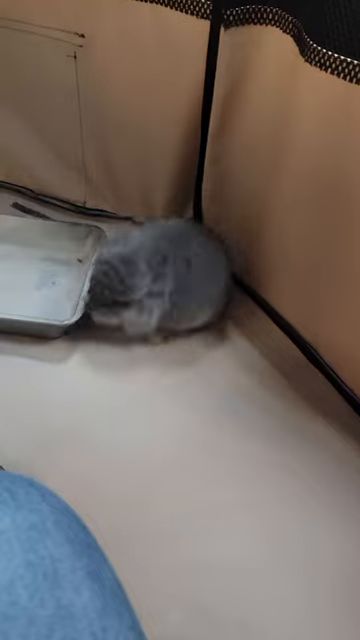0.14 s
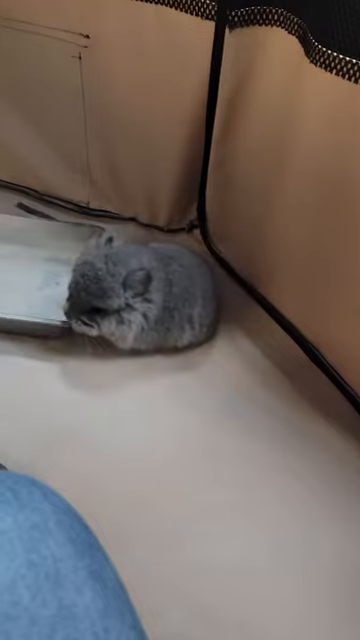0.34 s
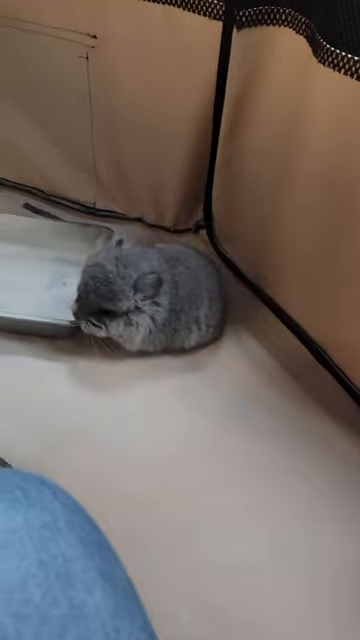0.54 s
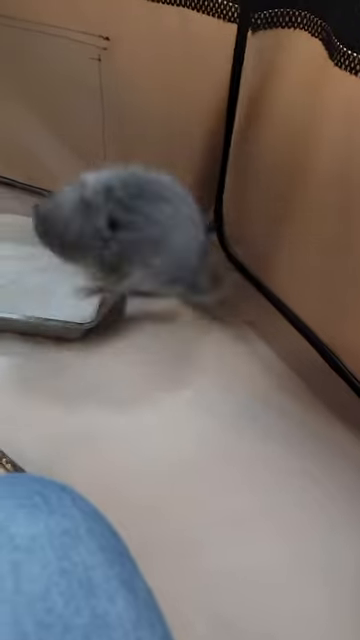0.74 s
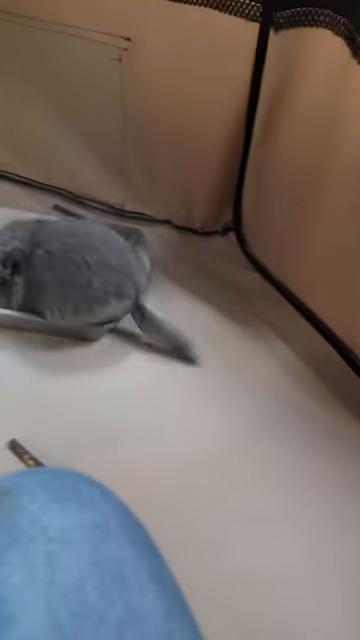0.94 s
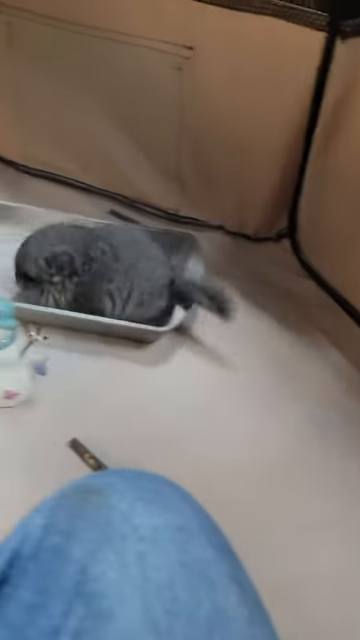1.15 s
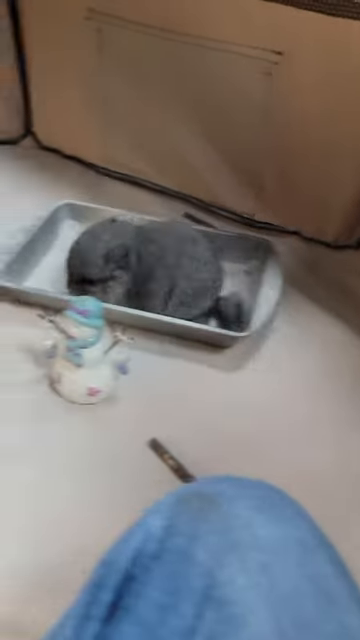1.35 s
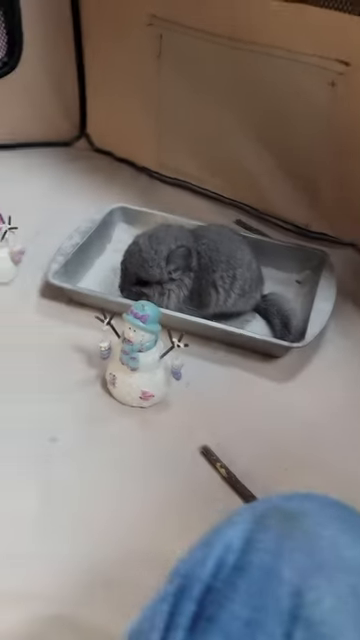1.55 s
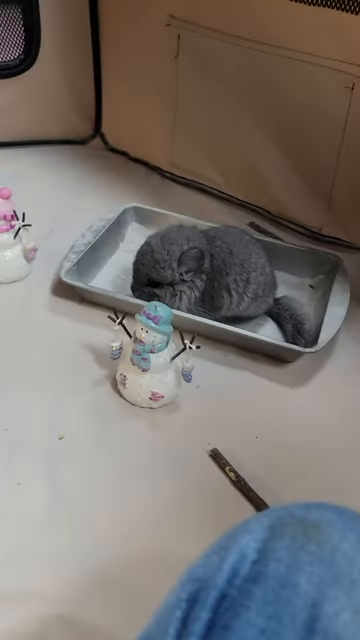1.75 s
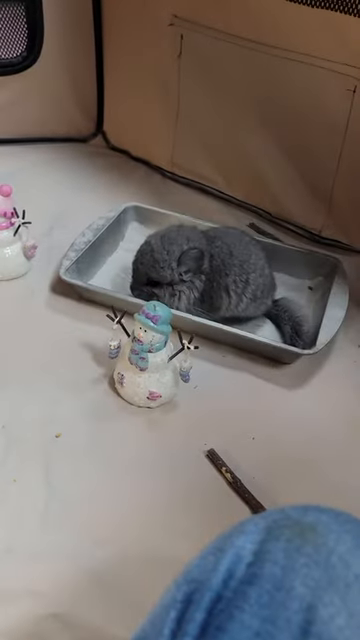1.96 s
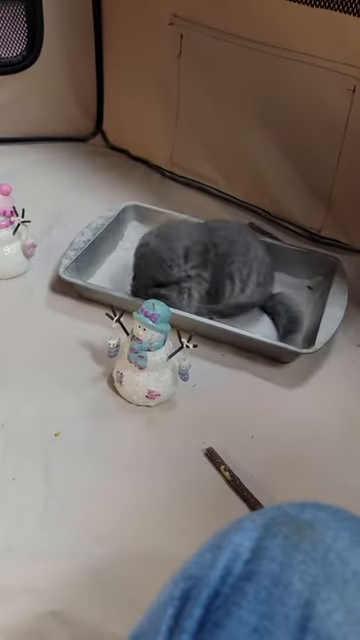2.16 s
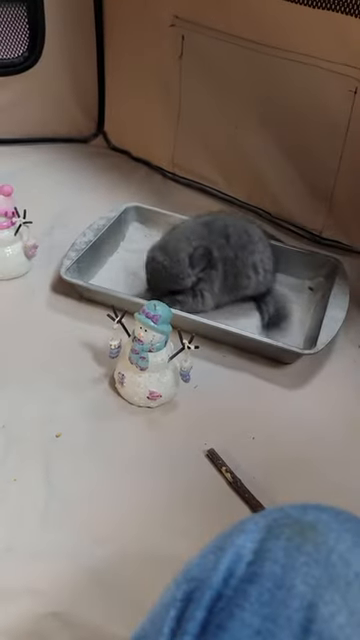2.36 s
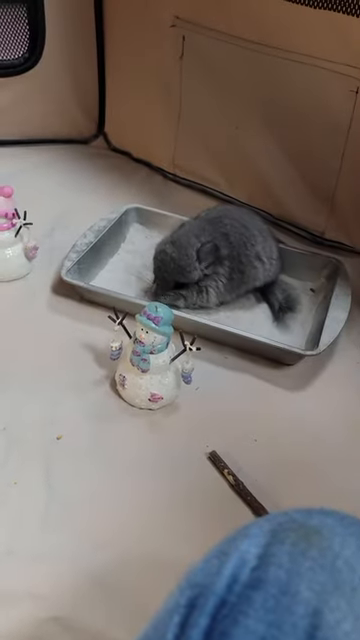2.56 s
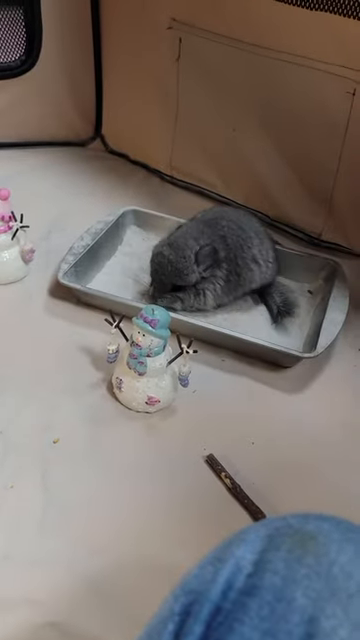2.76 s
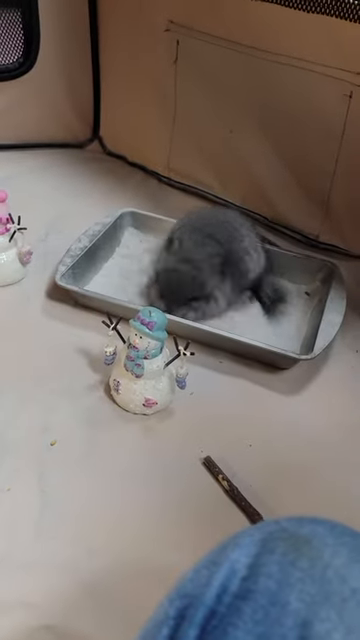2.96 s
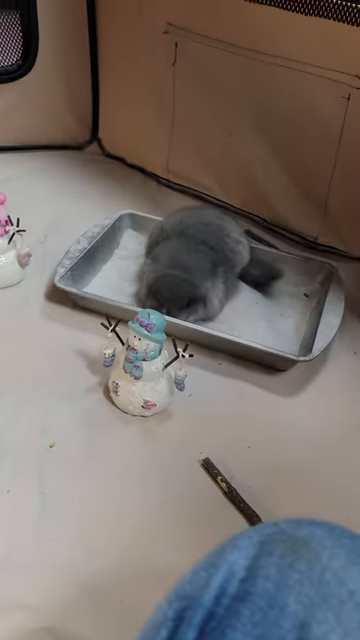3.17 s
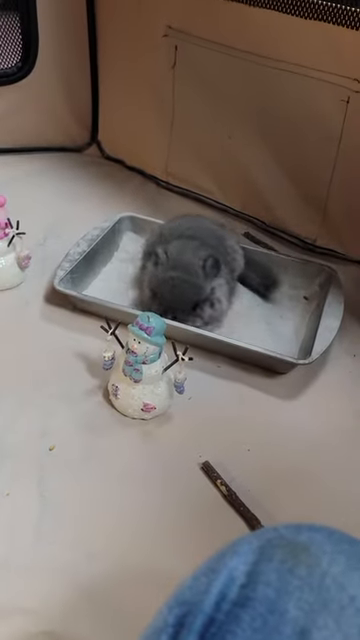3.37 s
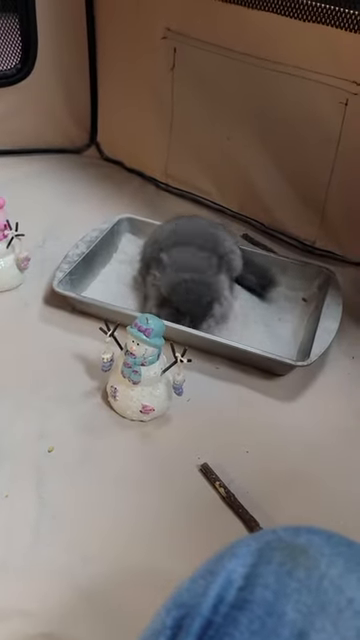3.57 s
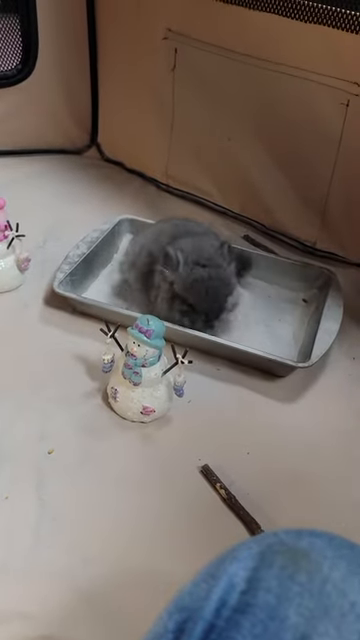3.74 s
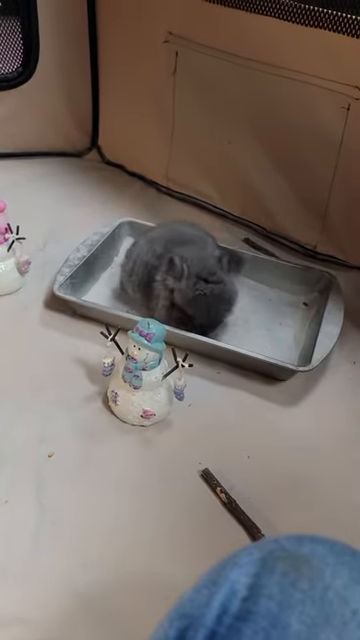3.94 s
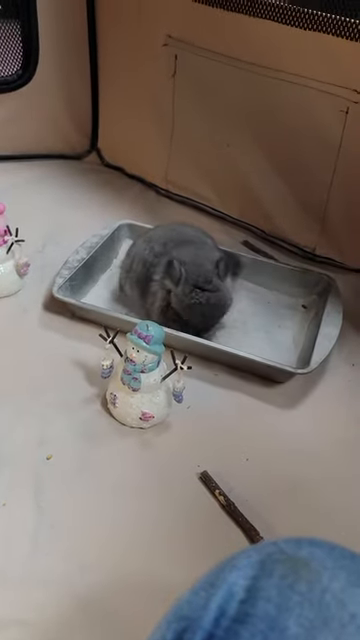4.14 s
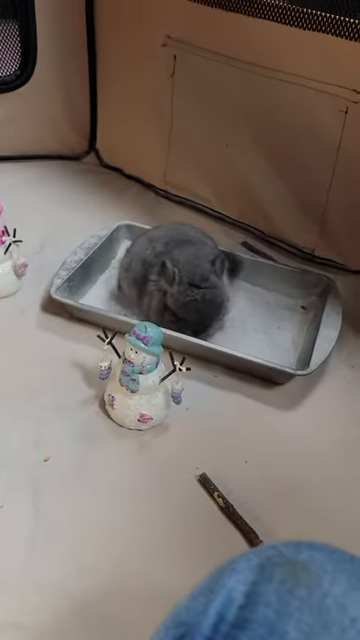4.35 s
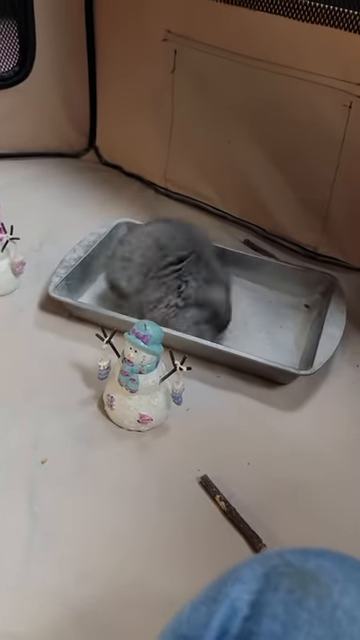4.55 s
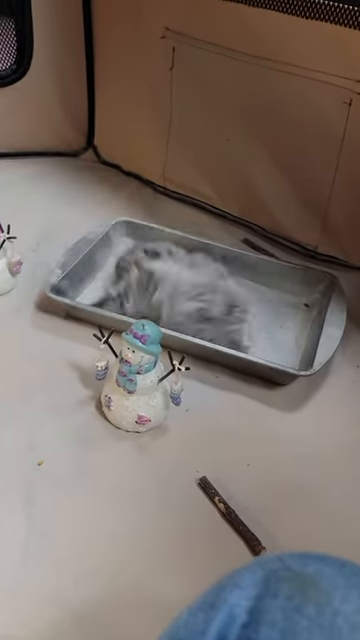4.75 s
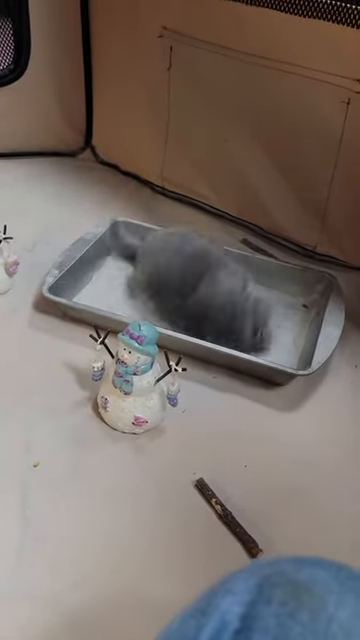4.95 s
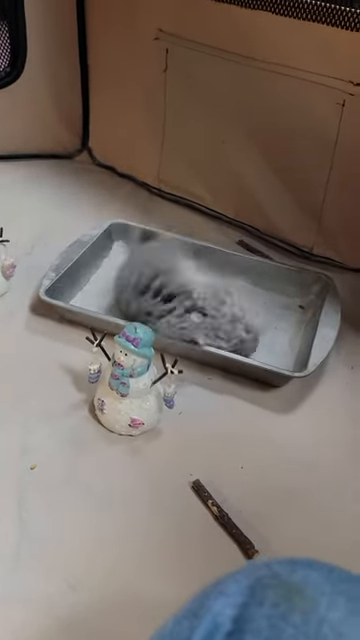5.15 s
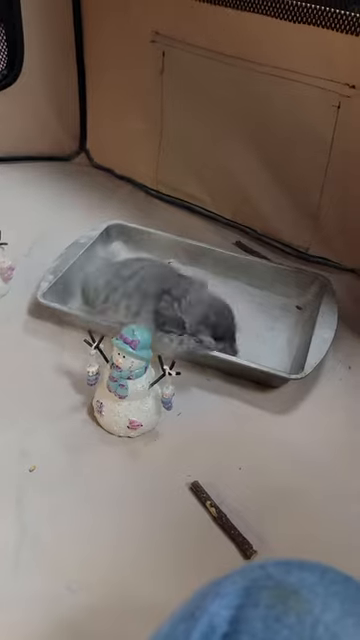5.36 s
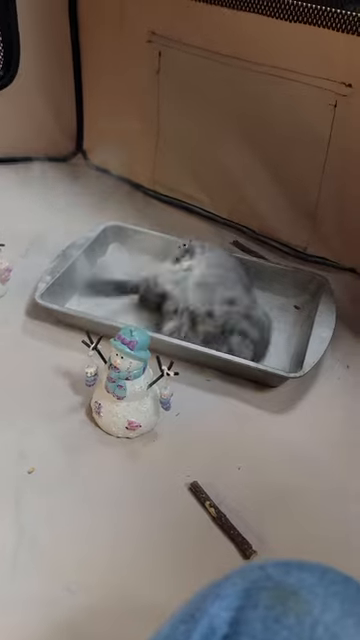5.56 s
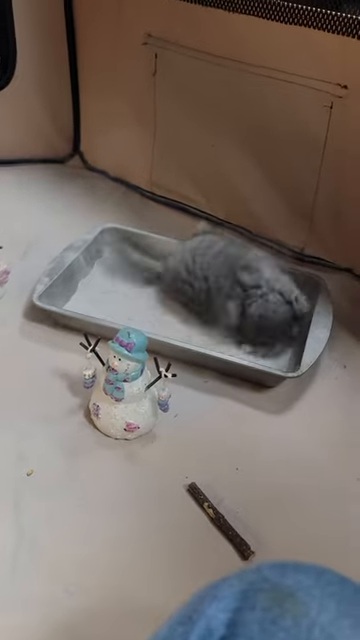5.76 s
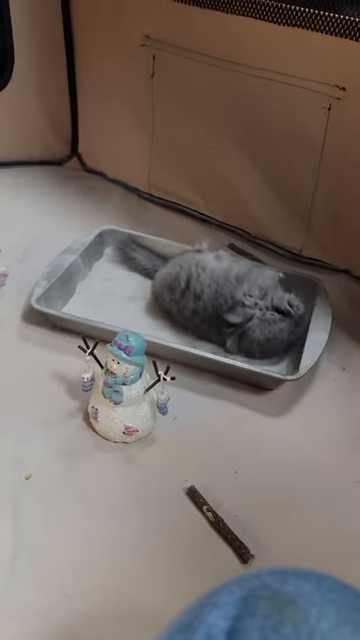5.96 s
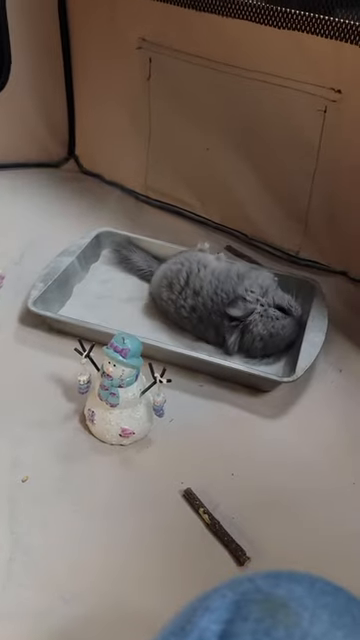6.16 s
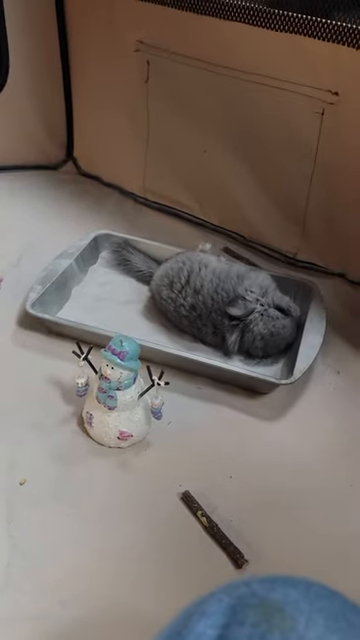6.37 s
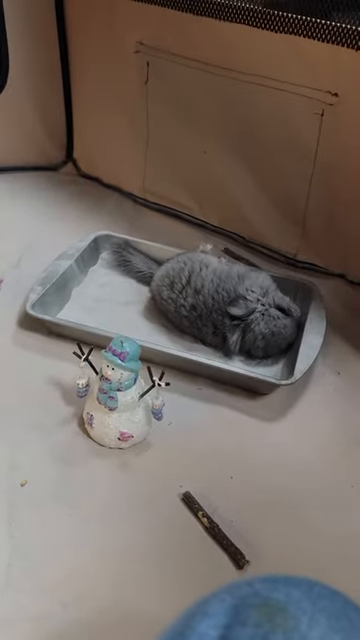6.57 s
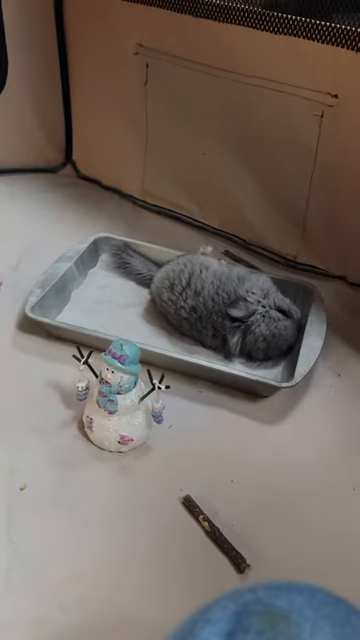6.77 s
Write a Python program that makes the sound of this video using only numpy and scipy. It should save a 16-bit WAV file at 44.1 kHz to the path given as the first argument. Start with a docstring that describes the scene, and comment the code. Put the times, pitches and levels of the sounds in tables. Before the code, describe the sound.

A chinchilla takes a dust bath in a metal tray indoors. First comes a quick cluster of dry ticks on the rim with a soft bump. Then its paws scrape through fine dust in short, hissing bursts that make the tray ring faintly. Later it rolls over, with busier swishing, dull thuds and a few sharper, damped metal knocks. The microphone is nearby, over a faint low room rumble.

```python
"""Dust bath in a metal tray

A small furry animal hops into a sheet-metal tray of fine dust on a soft floor, digs with quick paw
strokes and rolls over, knocking the walls. Dust grains hiss and set the damped tray ringing; claws or
teeth tick on the rim and the body thuds. Below lie a low room rumble with slow deep swells and a faint
hum, whirr and whine. Heard from two microphone ports some way apart."""
import sys
import numpy as np
from scipy import signal
from scipy.fft import rfft, irfft, next_fast_len
from scipy.io import wavfile
from scipy.ndimage import uniform_filter1d

SR = 44100
rng = np.random.default_rng(int(sys.argv[2]) if len(sys.argv) > 2 else 0)


def dump(signal):
    """Clip the signal to [-1, 1] and save it as 16-bit WAV at the path in sys.argv[1]."""
    limited = np.clip(np.atleast_2d(signal).T, -1, 1)
    pcm = np.round(limited * 32767).astype(np.int16)
    wavfile.write(sys.argv[1], SR, pcm)


N = 300321

# modes of the dusty tray, before the animal's weight damps them: pitch_hz, level_db, t60_s
TRAY = [(333.3, -14, 0.21), (786, -4, 0.059), (890, -6, 0.024), (1030, -8, 0.016), (1215, -1.5, 0.026),
        (1514, -9, 0.033), (1830, 1, 0.025), (2350, -4.5, 0.028), (2810, -1.5, 0.017), (3210, -10.5, 0.022)]
BODY_DAMPING = 0.75   # share of the ring time left under the animal


def amp(db):
    """Decibels to gain."""
    return 10 ** (np.asarray(db) / 20)


def unit(x):
    """Scale to rms 1."""
    return x / np.sqrt(np.mean(x ** 2) + 1e-20)


def over_hz(points):
    """A curve over log frequency, read at each bin that shaped() filters."""
    size = next_fast_len(N)
    hz, value = np.transpose(points)
    return np.interp(np.log(np.arange(size // 2 + 1) * SR / size + 1), np.log(hz), value)


def shaped(x, gains):
    """Equalise with one gain per frequency bin."""
    size = next_fast_len(N)
    return irfft(rfft(x, size) * gains, size)[..., :N]


def drift(rate_hz):
    """A smooth random wander of rms 1."""
    r = np.exp(-2 * np.pi * rate_hz / SR)
    return unit(signal.lfilter([1], [1, -2 * r, r * r], rng.standard_normal(N + SR))[SR:])


def resonance(noise, hz, width_hz):
    """Noise through one resonant peak."""
    return signal.lfilter(*signal.iirpeak(hz, hz / width_hz, SR), noise)


def ring(force, hz, t60, lead_rad):
    """One driven mode in stereo, the left side leading in phase."""
    pole = amp(-60 / (t60 * SR)) * np.exp(2j * np.pi * hz / SR)
    motion = signal.lfilter([1], [1, -pole], force + 1e-18)
    return np.array([(motion * np.exp(1j * lead_rad)).imag, motion.imag])


def bent_ring(force, hz, t60, bend):
    """One driven mode, its pitch bent by a changing fraction."""
    turn = np.exp(2j * np.pi * hz * np.cumsum(1 + bend) / SR)
    return (signal.lfilter([1], [1, -amp(-60 / (t60 * SR))], force * turn.conj()) * turn).imag


def grains(per_s, spread_db):
    """Random clicks of uneven size; some reach both sides, the right a little later."""
    sizes = amp(spread_db * np.minimum(rng.exponential(1, N), 5))
    left, right, both = sizes * (rng.random(N) < per_s / SR) * rng.standard_normal((3, N))
    return unit(np.array([left + 0.21 * both, right + 0.34 * np.roll(both, SR // 2200)]))


def digging():
    """Hiss, tray ring and claws follow the animal's effort, in lumps as the dust clumps."""
    sliding, ring_gain, powder_gain = bouts()
    effort = (sliding + strokes()) * amp(2.0 * drift(28.0))
    return effort * (dust_hiss(powder_gain) + ring_gain * tray_ring() + amp(-11) * claws())


def bouts(fall_db_per_s=357):
    """Dust slides under the body, then settles: its envelope, and the gains of ring and powder."""
    # digging and rolling: full_s, until_s, first_db, last_db, rise_db_per_s, ring_db, powder_db
    moves = [(0.904, 0.977, -43.5, -53, 406, -11.5, -2.5), (1.101, 1.21, -63, -82.5, 900, -1.5, 2.5),
             (1.36, 1.539, -50.5, -55, 152, -4, 0.5), (2.136, 2.298, -47, -46.5, 308, -5.5, -0.5),
             (2.343, 2.424, -52, -51.5, 600, 2, 2.5), (2.473, 2.523, -53.5, -56.5, 900, -2, 3.5),
             (2.913, 2.936, -66, -60, 1500, 1.5, 5.5), (3.003, 3.263, -55, -61.5, 500, -1, 0.5),
             (3.661, 3.774, -43.5, -47.5, 233, -17.5, -2.5), (3.814, 4.188, -52.5, -50.5, 500, -11.5, 2),
             (4.466, 4.72, -65, -48.5, 1489, -5, 0), (4.774, 5.175, -55, -61, 1476, -12.5, 0.5),
             (5.308, 5.345, -50.5, -53.5, 185, -4.5, 3.5), (5.408, 5.613, -57, -61, 504, -18, -2),
             (5.63, 5.964, -61.5, -61.5, 500, -6.5, -2.5)]
    t = np.arange(N) / SR
    hiss, ringing, powder = 0, 0, 0
    for full_s, until_s, first_db, last_db, rise_db_per_s, ring_db, powder_db in moves:
        held_db = np.interp(t, [full_s, until_s], [first_db, last_db])
        fade_db = rise_db_per_s * np.maximum(full_s - t, 0) + fall_db_per_s * np.maximum(t - until_s, 0)
        level = 1e-9 + amp(held_db - fade_db)
        hiss += level
        ringing += level * amp(ring_db)
        powder += level * amp(powder_db)
    return hiss, ringing / hiss, powder / hiss


def strokes():
    """Envelope of the paws sweeping through dust: each stroke swells and fades."""
    # paw strokes: start_s, level_db, rise_s
    sweeps = [(0.149, -46, 0.013), (0.645, -58, 0.024), (0.849, -57, 0.0045), (0.881, -60, 0.004),
              (1.086, -61, 0.0092), (1.157, -71, 0.0052), (1.167, -62, 0.0038), (1.265, -66, 0.0019),
              (1.453, -48.5, 0.022), (2.196, -51.5, 0.027), (2.973, -64.5, 0.011), (3.105, -64, 0.0032),
              (3.167, -61, 0.015), (3.58, -48, 0.011), (3.776, -43, 0.0073), (3.827, -54, 0.0056),
              (3.869, -48.5, 0.0035), (3.913, -45.5, 0.0062), (4.204, -54, 0.011), (4.089, -46, 0.0088),
              (4.147, -57.5, 0.0087), (4.497, -50, 0.045), (4.586, -53.5, 0.018), (4.663, -48.5, 0.0082),
              (4.776, -46.5, 0.0058), (4.942, -50, 0.029), (5.014, -59, 0.024), (5.128, -50.5, 0.023),
              (5.229, -65, 0.004), (5.3, -55, 0.0036), (5.6, -50, 0.018), (5.753, -46, 0.019)]
    out, t = np.zeros(N), np.arange(SR // 4) / SR
    for start_s, level_db, rise_s in sweeps:
        age = t / rise_s
        out[round(start_s * SR):][:len(t)] += amp(level_db) * (age * np.exp(1 - age)) ** 3.1
    return uniform_filter1d(out, size=SR // 400)


def dust_hiss(powder_gain):
    """Dense grains hiss in three bands, from grit to fine powder, each flickering on its own."""
    # colour of sliding dust: frequency_hz, level_db
    colour = [(1000, -52), (2000, 0), (4240, 1), (6690, 2), (9370, -4.5), (11500, 1), (14300, 7),
              (16000, 3.5)]
    hiss = unit(shaped(grains(9000, spread_db=0.5), amp(over_hz(colour))))
    grit, below_powder = [signal.sosfilt(signal.butter(3, hz, fs=SR, output="sos"), hiss)
                          for hz in (4000, 9500)]
    bands = grit, below_powder - grit, powder_gain * (hiss - below_powder)
    return sum(band * amp(0.77 * drift(25.0)) for band in bands)


def tray_ring():
    """Grains drive the sheet; modes come and go as the paw moves, bent and damped by its weight."""
    force = grains(1200, spread_db=0.5)
    sheet = 0
    for hz, level_db, t60 in TRAY[1:]:
        gain = amp(0.72 * level_db + 3.5 * drift(24))
        sheet += gain * bent_ring(force, hz, BODY_DAMPING * t60, bend=0.05 * drift(12.8))
    sheet = signal.sosfilt(signal.butter(4, 680, "high", fs=SR, output="sos"), sheet)
    hollow = ring(force[0], 0.869 * TRAY[0][0], t60=0.08, lead_rad=1.63)   # held down by the body
    return unit(sheet) + amp(-14.5) * unit(hollow)


def claws(ring_cycles=8.0):
    """Sparse claw catches, each ringing briefly at one of eight pitches."""
    catches = grains(260, spread_db=3.5)[0]
    choice = rng.integers(0, 8, N)
    return unit(sum(ring(catches * (choice == k), hz, ring_cycles / hz, lead_rad=1.9)
                    for k, hz in enumerate(np.geomspace(1050, 7000, num=8))))


def knocks(falloff_db_per_octave):
    """Rough hits crack and ring the modes near the struck pitch; body weight retunes them each time."""
    # knocks on the tray: start_s, level_db, struck_hz, contact_s
    hits = [(1.387, -38, 750, 0.0013), (1.468, -36.5, 1000, 0.0026), (1.517, -39, 840, 0.0015),
            (2.082, -39, 770, 0.0018), (2.167, -39, 1190, 0.00068), (2.403, -40, 770, 0.00076),
            (4.104, -42, 1010, 0.001), (4.601, -36, 780, 0.002), (4.669, -37, 930, 0.0012),
            (4.7142, -19, 1110, 0.00095), (4.731, -48, 880, 0.0034), (4.78, -27.5, 870, 0.00029),
            (5.314, -39.5, 770, 0.00038), (5.612, -24, 1700, 0.00072), (5.6135, -15, 980, 0.0008),
            (5.753, -26.5, 742, 0.0019), (5.7555, -32.5, 2300, 0.0007)]
    out, t = np.zeros((2, N)), np.arange(SR // 4) / SR
    crack_band = signal.butter(2, [2200, 7000], "band", fs=SR, output="sos")
    choke = amp(-9 * np.clip(t / .006 - 1.8, 0, 1))   # the body settles on the sheet
    for start_s, level_db, struck_hz, contact_s in hits:
        scatter, detune = rng.standard_normal((2, len(TRAY)))
        age = t / max(contact_s, .0003)
        crack = signal.sosfilt(crack_band, rng.standard_normal((2, len(t))))
        knock = amp(-19.5) * np.minimum(age, 1) * crack * np.exp(-t / 0.0067)
        roughness = 1 + 0.36 * rng.standard_normal(len(t))
        push = age * np.exp(1 - age) * roughness * age[1]   # same impulse for any contact time
        for k, (rest_hz, mode_db, t60) in enumerate(TRAY):
            hz = rest_hz * (1 + 0.023 * detune[k])
            falloff_db = falloff_db_per_octave * abs(np.log2(hz / struck_hz))
            gain = amp(mode_db - falloff_db + 2 * scatter[k])
            force = gain * push * np.cos(2 * np.pi * hz * t + scatter[k - 1])
            knock += ring(force, hz, BODY_DAMPING * t60, lead_rad=1.22)
        out[:, round(start_s * SR):][:, :len(t)] += amp(level_db) * knock * choke
    return out


def ticks(decay_cycles):
    """Claws or teeth on the rim: dry pitched clicks with the lows cut; harder ones crack more."""
    # rim ticks: start_s, level_db, pitch_hz
    taps = [(0.14, -41.5, 1330), (0.156, -33, 1310), (0.172, -26, 1440), (0.185, -30, 1400),
            (0.208, -39, 1520), (0.213, -30, 1190), (0.293, -42.5, 1340), (0.373, -45, 1560),
            (0.429, -41, 820), (0.663, -34.5, 1760), (0.668, -30, 1680), (0.675, -40, 1460),
            (0.723, -41, 2400)]
    out, t = np.zeros((2, N)), np.arange(SR // 50) / SR
    attack = 1 - np.exp(-t / 0.00023)
    for start_s, level_db, hz in taps:
        tone = np.sin(2 * np.pi * hz * t + [[1.4], [0]]) * np.exp(-t * hz / decay_cycles)
        noise = signal.lfilter(*signal.butter(2, 1.67 * hz, fs=SR), rng.standard_normal((2, len(t))))
        crack = amp(0.17 * (level_db + 28)) * noise * np.exp(-t / 0.0068)
        tick = signal.lfilter(*signal.butter(3, .75 * hz, "high", fs=SR), tone + crack)
        out[:, round(start_s * SR):][:, :len(t)] += amp(level_db) * tick * attack
    return out


def thuds():
    """The soft body bumps the tray floor: dull low pushes that swell and die."""
    # body thuds: start_s, level_db, pitch_hz, rise_cycles
    bumps = [(0.184, -40, 422, 0.43), (2.404, -52, 350, 1.8), (2.479, -49, 319, 1.1),
             (3.758, -44.5, 205, 0.23), (4.584, -41, 276, 0.68), (4.781, -41.5, 355, 1.05),
             (5.602, -39.5, 277, 0.5), (5.756, -39, 318, 0.76)]
    out, t = np.zeros((2, N)), np.arange(SR // 5) / SR
    for start_s, level_db, hz, rise_cycles in bumps:
        age = t * hz / rise_cycles
        tone = np.sin(2 * np.pi * hz * t + [[1.2], [0]])
        out[:, round(start_s * SR):][:, :len(t)] += amp(level_db) * age * np.exp(1 - age) * tone
    return out


def echoes(x, t60, cutoff_hz):
    """Soft walls close by scatter a short dull tail, separate on each side."""
    t = np.arange(SR // 4) / SR
    tail = rng.standard_normal((2, len(t))) * amp(-60 * t / t60) * (t > .004)
    tail = signal.lfilter(*signal.butter(1, cutoff_hz, fs=SR), tail)
    return signal.fftconvolve(x, tail / np.sqrt(np.sum(tail[0] ** 2)), axes=1)[:, :N]


def room(level_db=-58.5):
    """Gently wavering rumble and faint hiss, centred only in the bass."""
    # colour of the room tone: frequency_hz, level_db
    colour = [(18, -42), (30, -9), (105, -0.5), (128, -2), (155, -13), (220, -12.5), (328, -18),
              (450, -24.5), (1130, -32), (1390, -28), (2610, -40), (6900, -47), (8520, -64), (12300, -46),
              (16000, -44)]
    # likeness of left and right: frequency_hz, correlation
    likeness = [(180, 0.97), (290, 0.13), (640, -0.86), (1400, -0.45), (3000, -0.18)]
    gains, alike = amp(over_hz(colour)), over_hz(likeness)
    mid = shaped(rng.standard_normal(N), gains * np.sqrt(1 + alike))
    side = shaped(rng.standard_normal(N), gains * np.sqrt(1 - alike))
    return amp(level_db + drift(.5)) * unit(np.array([mid + side, mid - side]))


def swells():
    """Slow deep booms of unsteady pitch that rise and sink."""
    # deep swells: middle_s, peak_db, half_length_s, pitch_hz
    booms = [(0.787, -51.5, 0.12, 36.54), (4.23, -49, 0.13, 41.85), (4.824, -49, 0.14, 38),
             (5.356, -46, 0.078, 46.4), (5.92, -52, 0.13, 45.75), (6.5, -40.5, 0.1, 47)]
    t = np.arange(N) / SR
    wavering_t = np.cumsum(1 + 0.0588 * drift(6.43)) / SR
    out = np.zeros((2, N))
    for middle_s, peak_db, half_length_s, hz in booms:
        envelope = amp(peak_db) * np.exp(-((t - middle_s) / half_length_s) ** 2)
        out += envelope * np.sin(2 * np.pi * hz * wavering_t + [[.4], [0]])
    return out


def hum(pitch_hz=111.53, width_hz=4.8, harmonics_db=(-68.5, -73.5, -80)):
    """A faint wavering hum: noise in narrow resonances at multiples of one low pitch."""
    noise = rng.standard_normal(N + SR)
    return sum(amp(level_db) * unit(resonance(noise, k * pitch_hz, width_hz)[SR:])
               for k, level_db in enumerate(harmonics_db, 1))


def whirr(pitch_hz=1360, width_hz=1020):
    """A faint mid-range whirr that comes and goes: noise in one broad resonance."""
    # level ride of the whirr: time_s, level_db
    ride = [(0, -68), (.55, -75.5), (.8, -75), (2.3, -80.5), (2.5, -72.5), (2.9, -74.5), (4.4, -123),
            (5.9, -72), (6.2, -75), (6.35, -98)]
    envelope = amp(np.interp(np.arange(N) / SR, *np.transpose(ride)))
    return envelope * unit(resonance(rng.standard_normal((2, N)), pitch_hz, width_hz))


def whine(middle_s=2.74, half_length_s=.19, level_db=-79, pitch_hz=3140, width_hz=160):
    """A brief thin whine: noise in one narrow resonance."""
    envelope = amp(level_db) * np.exp(-((np.arange(N) / SR - middle_s) / half_length_s) ** 4)
    return envelope * unit(resonance(rng.standard_normal((2, N)), pitch_hz, width_hz))


def scene():
    """The animal in its tray and its close reflections, over the room's background."""
    animal = digging() + knocks(falloff_db_per_octave=13.5) + ticks(decay_cycles=1.3) + thuds()
    reflections = amp(-16.0) * echoes(animal, t60=0.073, cutoff_hz=1560)
    return animal + reflections + room() + hum() + whirr() + whine() + swells()


def record(dry):
    """Each microphone port has its own colour; the top is cut steeply."""
    # balance of the ports: frequency_hz, left_minus_right_db
    balance = [(100, -2), (340, -8), (520, -0.5), (1900, 1.5), (4400, -1), (8500, 5.5), (12500, -4),
               (15000, -1.5)]
    cutoff_hz = 15980
    ports = shaped(dry, amp(over_hz(balance) * [[.5], [-.5]]))
    return signal.sosfilt(signal.ellip(12, .5, 75, cutoff_hz, fs=SR, output="sos"), ports)


dry = scene()
out = record(dry)
dump(out)
```